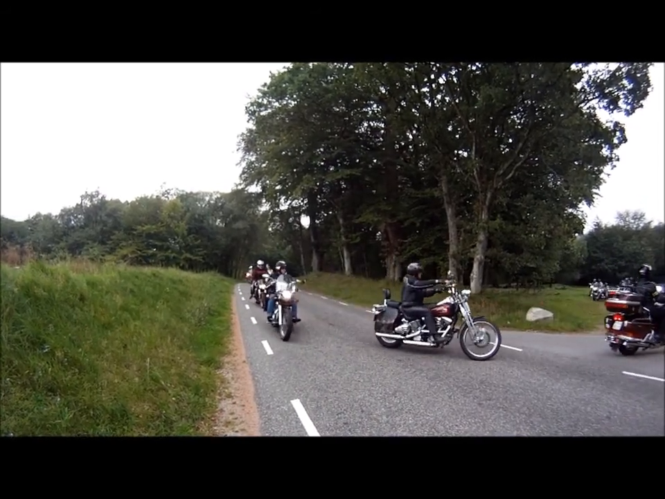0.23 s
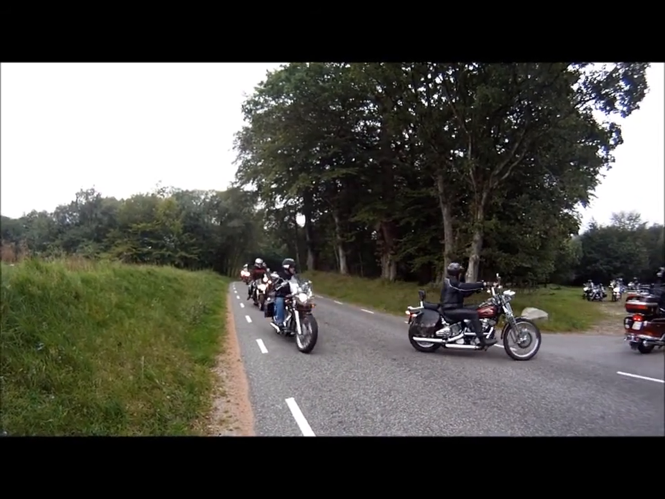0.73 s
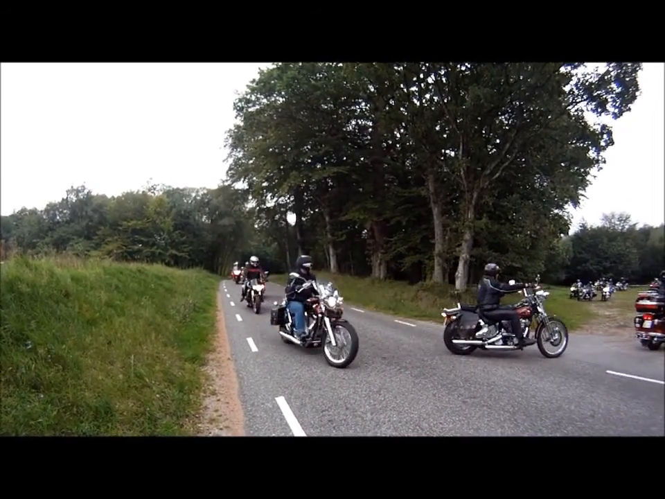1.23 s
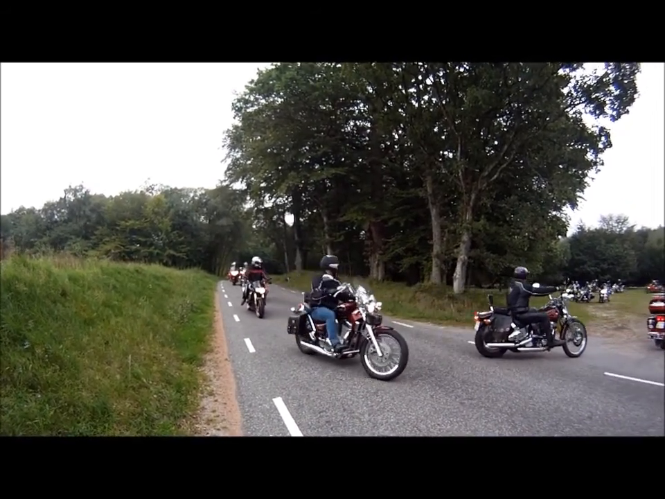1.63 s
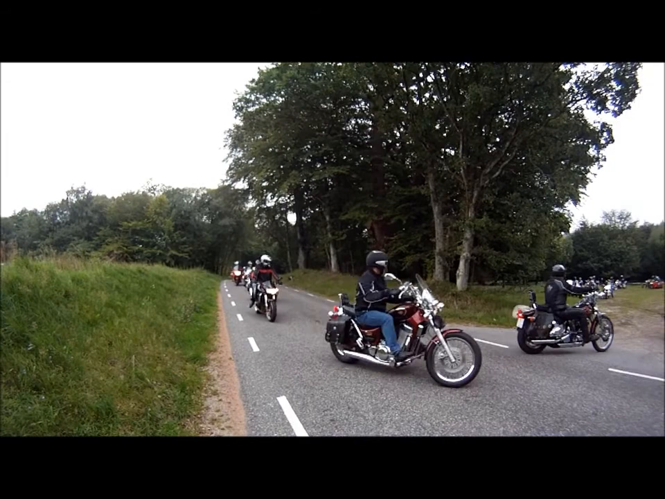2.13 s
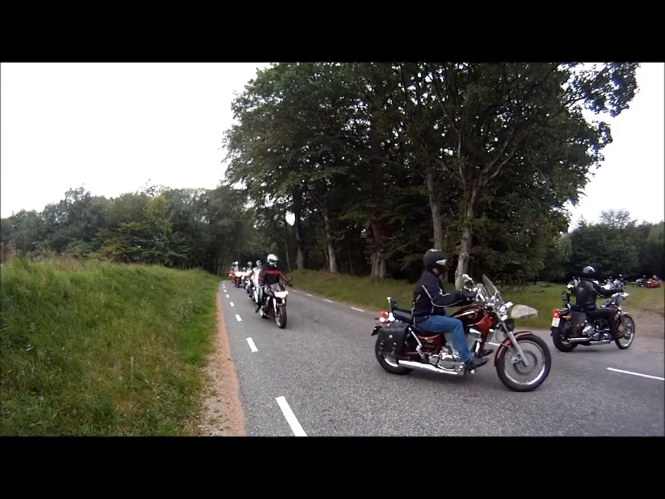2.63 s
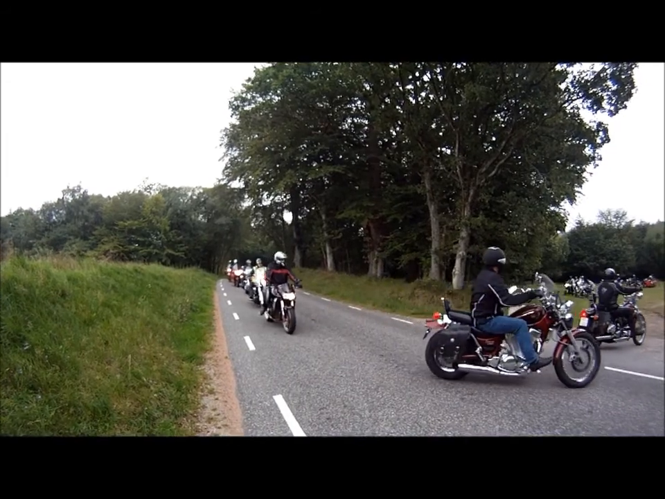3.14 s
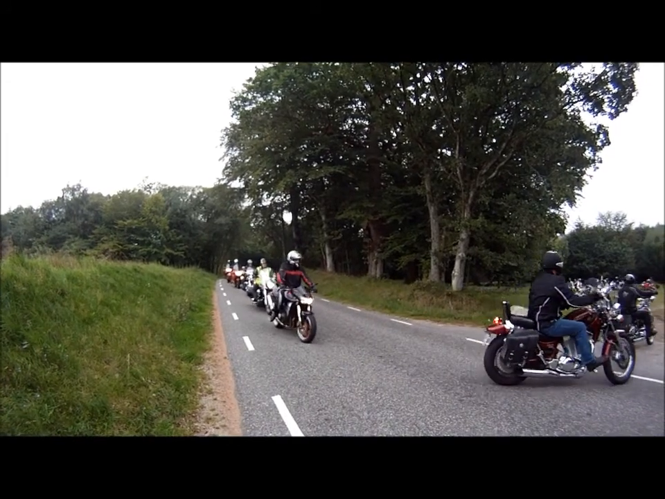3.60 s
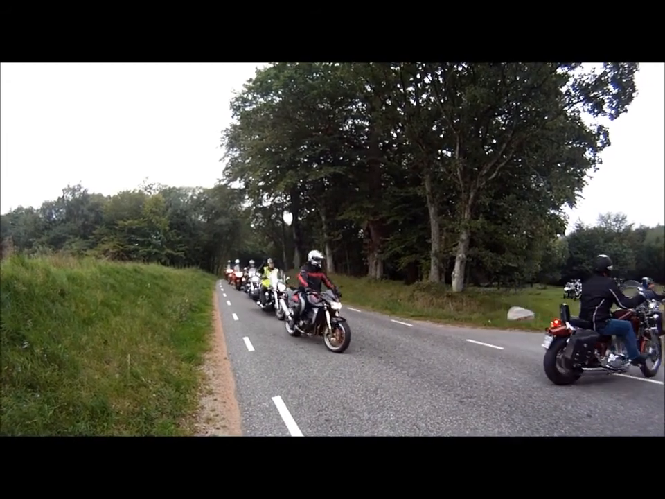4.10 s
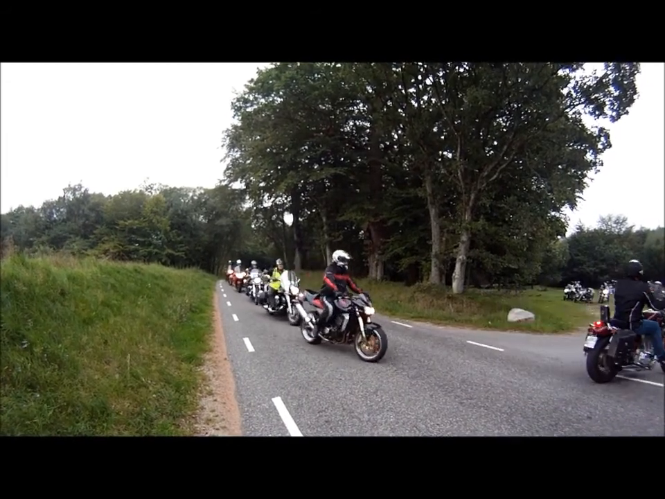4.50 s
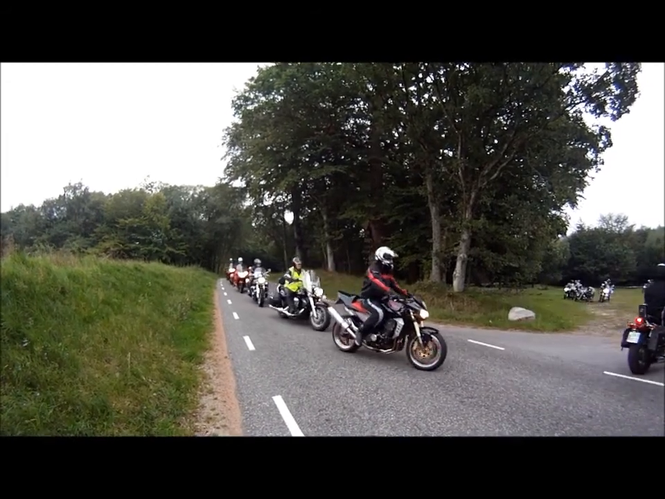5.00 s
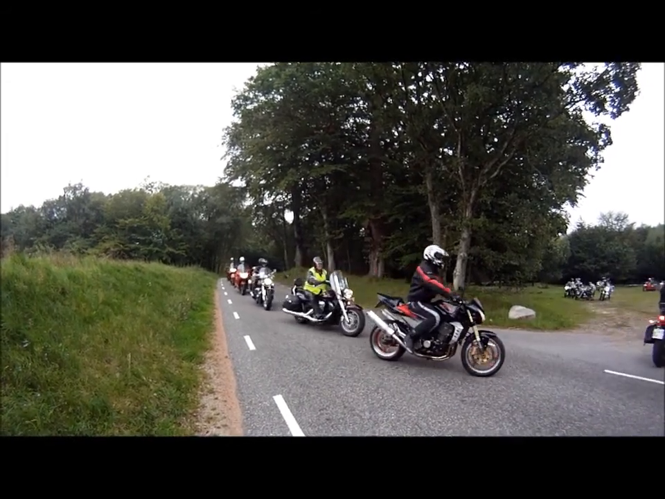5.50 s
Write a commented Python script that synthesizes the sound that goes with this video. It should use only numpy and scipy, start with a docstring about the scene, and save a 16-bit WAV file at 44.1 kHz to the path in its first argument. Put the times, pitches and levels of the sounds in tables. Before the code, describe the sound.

Motorcycles roll slowly past a small camera: thumping V-twin exhaust, low engine rumble, humming four-cylinder, clattering valves and faint brake squeaks.

```python
"""Uneven barks of a near V-twin over a rumbling column of motorcycles, slowly passing a small camera.
A four-cylinder bike hums, a leading bike burbles away, valve gear clatters, brakes squeak over low noise.
Exhausts are trains of firings that ring pipes and shape noise; the hum and squeaks are unsteady sines.
The camera ducks under loud peaks, and its coarse sampling mirrors everything into a gritty treble."""
import sys
import numpy as np
from scipy import signal
from scipy.fft import rfft, irfft, next_fast_len
from scipy.io import wavfile
from scipy.ndimage import uniform_filter1d, map_coordinates

SR = 44100
rng = np.random.default_rng(int(sys.argv[2]) if len(sys.argv) > 2 else 0)


def inscribe(sig):
    """Save sig as 16-bit PCM at rate SR to the path in sys.argv[1].

    A 1-D sig is mono; a 2-D sig holds one channel per row.
    Samples are clipped to [-1, 1] before scaling.
    """
    pcm = np.round(np.clip(np.atleast_2d(sig).T, -1, 1) * 32767)
    wavfile.write(sys.argv[1], SR, pcm.astype(np.int16))


N = 253575
T = np.arange(N) / SR  # seconds

# Levels in the tables are relative: each layer adds its own trims and scatter.
# Noise colours. Each row: frequency in Hz, relative level in dB.
LOW_NOISE_COLOUR = [(12, -24), (20, 9), (124, 1), (385, -14), (3010, -40.5), (5000, -51), (6500, -71),
                    (11000, -120)]
BURBLE_COLOUR = [(200, -12), (330, -0.5), (400, 0.5), (480, -6), (590, 4.5), (720, -6.5), (950, -28),
                 (1200, -9.5), (1500, -22), (3000, -40)]
MUFFLER_RESPONSE = [(20, -34), (30, -39), (40, 1), (55, -6.5), (70, -2), (120, -6), (200, -5.5),
                    (300, -10.5), (450, -19.5), (900, -31), (2000, -80)]  # a filter on the rumble rather than a noise
RASP_COLOUR = [(100, -43), (250, 8), (350, -1), (470, -9), (650, -4.5), (800, -9.5), (1100, -20),
               (2500, -37)]
CLATTER_COLOUR = [(500, -2.5), (1000, -4.5), (1500, 0), (2200, 3), (2480, -1), (2850, 4.5), (3300, -4),
                  (3900, -1.5), (4600, -8), (5800, -9)]
CHAIN_COLOUR = [(1000, -18), (3000, -12), (4300, -2), (5800, -10.5)]
GROWL_COLOUR = [(150, -29), (240, 9), (300, -3.5), (390, -2.5), (480, -12.5), (600, -21), (1150, -25),
                (2500, -36)]
BARK_COLOUR = [(100, -24), (280, 4), (450, -3), (640, -3), (800, -1), (1100, -20.5), (1600, -14.5),
               (3000, -27)]
SPIT_COLOUR = [(700, -29), (1300, -1.5), (1800, -9.5), (2300, 7.5), (2550, -9.5), (2900, 5), (3400, -0.5),
               (4100, -1), (5800, -13.5)]
# The column as a whole. Each row: time in seconds, rumble, exhaust rasp and clatter levels in dB.
COLUMN_LEVELS = [(0.05, -19, -37.5, -44.5), (0.67, -18, -36.5, -43), (1.44, -23, -40.5, -48),
                 (1.77, -17.5, -34.5, -42.5), (1.92, -22.5, -37, -46.5), (2.53, -19.5, -38, -45.5),
                 (3.5, -19.5, -38.5, -46), (3.89, -20.5, -34, -42), (4.36, -21.5, -39.5, -47),
                 (4.73, -19, -36.5, -42.5), (5.4, -20, -35.5, -41.5), (5.65, -20, -43.5, -44)]
# V-twins along the column. Each row: engine cycles a second at the start, at the end, pipe in Hz, level in dB.
FAR_TWINS = [(13.2, 14.5, 86.3, -3), (16.9, 15.6, 100.8, -1), (11.3, 12.2, 60, -5.5),
             (19.5, 21.4, 150.4, -8), (15.1, 17.7, 190, -7)]
# Clicks of chain and gearbox. Each row: time in seconds, level in dB.
CHAIN_CLICKS = [(0.5896, -35), (0.6078, -28.5), (3.6494, -25), (3.7025, -31), (3.7378, -21),
                (3.8162, -25.5), (3.892, -26), (3.9665, -32), (4.481, -27), (4.583, -27.5), (4.6824, -31),
                (4.8776, -30)]
# Squeaks of a dragging brake. Each row: middle in seconds, length in seconds, start Hz, end Hz, level in dB.
BRAKE_SQUEAKS = [(.92, .2, 3755, 3750, -54), (1.11, .17, 3750, 3745, -49), (2.14, .08, 3760, 3740, -49),
                 (2.36, .26, 3740, 3755, -53), (4.08, .1, 3780, 3725, -41), (4.245, .04, 3520, 3540, -44),
                 (5.2, .45, 3760, 3780, -50), (5.6, .3, 3820, 3870, -55)]
# Rough engine whines. Each row: middle in seconds, length in seconds, start Hz, end Hz, level in dB.
ENGINE_WHINES = [(0.3, 0.73, 1170, 1174, -57), (3.75, 0.794, 730, 765, -43.5),
                 (4.15, 0.2504, 590, 700, -44.5), (3.824, 0.4, 260, 256, -34)]
# The four-cylinder engine. Each row: time in seconds, pitch of its third order in Hz, level in dB.
FOUR_COURSE = [(0, 117, -18.5), (.6, 118.4, -23.5), (2.1, 116, -21.5), (2.7, 115.3, -22.5),
               (3.6, 116.5, -20), (3.95, 117.1, -15), (4.3, 114.5, -18.5), (4.9, 115.7, -17.5),
               (5.45, 116.1, -15.5), (5.75, 117.2, -16.5)]
# Its harmonics. Each row: multiple of the engine cycle, level in dB.
FOUR_ORDERS = [(1, -17), (2, -10), (3, -1.5), (4, -12), (5, -19.5), (6, -15), (7, -21)]
# The near V-twin's crank. Each row: time in seconds, engine cycles turned.
CRANK_TURNS = [(-.19, 0), (.103, 2), (.254, 3), (.395, 4), (.672, 6), (1.49, 12), (2.157, 17), (2.421, 19),
               (2.56, 20), (2.951, 23), (5.75, 44)]
# Its lope, three beats in two cycles. Each row: place in cycles, bark, thump and spit levels in dB.
LOPE_BEATS = [(0, -29, -9, -37), (.435, -22.5, -11.5, -31), (1, -21, -11, -30)]
# Its passing and riding off, for the loping beats. Each row: time in seconds, level in dB.
PASS_LEVELS = [(0, -2), (1.6, 1.5), (2.8, -2.5), (3.4, -9), (5.75, -16.5)]
# Single hard firings. Each row: time in seconds, bark, thump and spit levels in dB.
HARD_FIRINGS = [(.103, -22, -17, -33.5), (.17, -17.5, -1.5, -26), (.254, -16.5, -17, -30),
                (.456, -12, -4, -37), (.672, -15.5, -6.5, -26), (1.219, -23, -4.5, -34.5),
                (1.352, -18.5, -5.5, -25), (1.817, -15.5, -23, -26), (1.89, -11, -3.5, -18.5),
                (2.082, -17.5, -5, -21.5), (2.56, -17.5, -12.5, -27.5), (2.824, -16.5, -10, -27.5),
                (3.087, -19.5, -11, -36), (3.352, -21.5, -18, -37), (4.244, -33, -4, -38),
                (4.822, -20, -12.5, -37), (5.088, -15, -4, -28)]

HUM_ORDER = 3  # the order whose pitch FOUR_COURSE gives
GROWL_DB_PER_S = 0.83  # the growl gains on the hum as the bike nears
HOLD_HZ = 12000  # the camera's coarse sampling rate
TOP_HZ = 15500  # nothing passes above this


def amp(db):
    """Decibels to gain."""
    return 10 ** (np.asarray(db) / 20)


def unit(x):
    """Scale to rms 1."""
    return x / np.sqrt(np.mean(x ** 2) + 1e-20)


def along(points, hz):
    """Read a (Hz, value) table on a logarithmic frequency axis."""
    point_hz, values = np.transpose(points)
    return np.interp(np.log(hz + 1), np.log(point_hz + 1), values)


def curves(rows):
    """Draw a sample-by-sample curve through each column after the time."""
    seconds, *columns = np.transpose(rows)
    return [np.interp(T, seconds, column) for column in columns]


def wobble(rate):
    """A smooth random curve with rate knots a second."""
    knots = rng.standard_normal(int(N * rate / SR) + 4)
    return map_coordinates(knots, [T * rate])


def filtered(x, response):
    """Shape the spectrum of x by a function of frequency."""
    size = next_fast_len(N + SR // 2)
    spectrum = rfft(x, size) * response(np.fft.rfftfreq(size, 1 / SR))
    return irfft(spectrum, size)[..., :N]


def hiss(colour):
    """Coloured noise of rms 1."""
    return unit(filtered(rng.standard_normal(N), lambda hz: amp(along(colour, hz))))


def strikes(times, levels_db):
    """One impulse at each time."""
    places = np.clip(np.round(times * SR).astype(int), 0, N - 1)
    return np.bincount(places, amp(levels_db), N)


def bursts(times, levels_db, rise, life):
    """An envelope that swells over rise and dies over life, in seconds, at each time."""
    t = np.arange(SR // 10) / SR
    shape = (1 - np.exp(-(t / rise) ** 2)) * np.exp(-t / life)
    return signal.fftconvolve(strikes(times, levels_db), shape / shape.max())[:N]


def rings(times, hz, levels_db, rise, life):
    """A short ring that starts afresh, at its own pitch, at each time."""
    latest = np.maximum(np.searchsorted(times, T) - 1, 0)
    wave = np.sin(2 * np.pi * hz[latest] * (T - times[latest]))
    return -bursts(times, levels_db, rise, life) * wave


def crossings(cycles):
    """The moments at which a cycle count passes whole numbers."""
    return T[1:][np.diff(np.floor(cycles)) > 0]


def tone(middle, length, start_hz, end_hz, db, waver, flutter_db):
    """A gliding, unsteady sine that swells and fades."""
    place = np.clip((T - middle) / length, -0.5, 0.5)
    glide_hz = start_hz + (end_hz - start_hz) * (place + 0.5)
    phase = 2 * np.pi * np.cumsum(glide_hz * (1 + waver * wobble(220))) / SR
    level = amp(db + flutter_db * wobble(35)) * np.cos(np.pi * place)
    return level * np.sqrt(2) * np.sin(phase)


def low_noise(db=-38, swell_db=2, fade_db_per_s=1):
    """Faint low noise, separate in each channel, slowly fading."""
    channels = [amp(db - fade_db_per_s * T + swell_db * wobble(20)) * hiss(LOW_NOISE_COLOUR) for side in "LR"]
    return np.array(channels)


def leaving_bike(puffs_per_s=27, db=-33, fade_db_per_s=11, scatter_db=2):
    """The leading bike puffs out burbling gas at an unsteady rate and fades round the bend."""
    times = crossings(np.cumsum(puffs_per_s * (1 + 0.162 * wobble(18))) / SR)
    sizes_db = scatter_db * rng.standard_normal(len(times))
    puffs = bursts(times, sizes_db, rise=0.005, life=0.014)
    return amp(db - fade_db_per_s * T) * unit(puffs) * hiss(BURBLE_COLOUR)


def pipe_resonance(hz, pipe_hz, sharpness):
    """A pipe rings around its own pitch; sharpness is its Q."""
    damping = 1j * hz * pipe_hz / sharpness
    return damping / (pipe_hz ** 2 - hz ** 2 + damping)


def far_twins(bank=0.43, sharpness=2.03, scatter_db=1.33, rumble_db=1, rasp_db=2, steady=0.19):
    """Two firings a cycle, bank of a cycle apart, ring each bike's pipe and puff out rasping gas."""
    rumble_level, rasp_level, _ = curves(COLUMN_LEVELS)
    rumble, puffs = np.zeros(N), np.zeros(N)
    for start, end, pipe_hz, db in FAR_TWINS:
        speed = np.linspace(start, end, N) * (1 + 0.03 * wobble(3))
        cycles = rng.random() + np.cumsum(speed) / SR
        times = np.concatenate([crossings(cycles), crossings(cycles + bank)])
        sizes_db = db + scatter_db * rng.standard_normal(len(times))
        firings = bursts(times, sizes_db, rise=0.00037, life=0.00093)
        rumble += filtered(firings, lambda hz: pipe_resonance(hz, pipe_hz, sharpness))
        puffs += bursts(times, sizes_db, rise=0.0015, life=0.0067)
    rumble = unit(filtered(rumble, lambda hz: amp(along(MUFFLER_RESPONSE, hz))))
    rasp = unit(steady + unit(puffs)) * hiss(RASP_COLOUR)
    return amp(rumble_level + rumble_db) * rumble + amp(rasp_level + rasp_db) * rasp


def clatter(clatter_db=3.5, steady=1.88, scatter_db=4, click_db=-1):
    """Dense taps of many valves over steady tyre hiss, with single clicks of chain and gearbox."""
    level = curves(COLUMN_LEVELS)[2]
    tap_times = rng.uniform(0, N / SR, size=700)
    taps = bursts(tap_times, scatter_db * rng.standard_normal(size=700), rise=0.00016, life=0.0061)
    valves = amp(level + clatter_db) * unit(steady + unit(taps)) * hiss(CLATTER_COLOUR)
    click_times, click_levels = np.transpose(CHAIN_CLICKS)
    clicks = bursts(click_times, click_levels + click_db, rise=0.001, life=0.0051)
    return valves + clicks * hiss(CHAIN_COLOUR)


def brake_squeaks():
    """A dragging brake disc sings in nearly steady tones."""
    return sum(tone(*row, waver=0.00593, flutter_db=2.5) for row in BRAKE_SQUEAKS)


def engine_whines():
    """Passing engines whine, roughened by a quick waver of pitch and level."""
    return sum(tone(*row, waver=0.0351, flutter_db=4.0) for row in ENGINE_WHINES)


def four_cylinder(hum_db=-2, shake=0.097, chop=0.98, growl_db=-16.5, hunt=0.00818):
    """Wavering orders of the engine cycle make the hum; gas growls in a swell once a cycle."""
    hum_hz, level = curves(FOUR_COURSE)
    cycle_hz = hum_hz * (1 + hunt * wobble(6)) / HUM_ORDER
    phase = 2 * np.pi * np.cumsum(cycle_hz) / SR
    hum = np.zeros(N)
    for order, db in FOUR_ORDERS:
        shaken = round(order) * (phase + shake * wobble(12)) + 2 * np.pi * rng.random()
        hum += amp(db + 1.6 * wobble(7.6)) * np.sin(shaken)
    growl_level = amp(growl_db + GROWL_DB_PER_S * (T - T.mean()))
    growl = growl_level * unit(1 + chop * np.cos(phase)) * hiss(GROWL_COLOUR)
    return amp(level) * (amp(hum_db) * np.sqrt(2) * hum + growl)


def twin_beats(scatter_db=2.5, thump_scatter_db=2.0):
    """The lope repeats every two crank cycles; a hard firing replaces any beat it falls on."""
    clock, turned = np.transpose(CRANK_TURNS)
    place, bark, thump, spit = np.tile(LOPE_BEATS, (int(turned[-1]) // 2, 1)).T
    cycles = place + 2 * (np.arange(len(place)) // len(LOPE_BEATS))
    times = np.interp(cycles, turned, clock)
    level = np.interp(times, *np.transpose(PASS_LEVELS))
    force = level + scatter_db * rng.standard_normal(len(times))
    thump_force = level + thump_scatter_db * rng.standard_normal(len(times))
    beats = np.column_stack([times, bark + force, thump + thump_force, spit + force])
    gaps = np.abs(times[:, None] - np.array(HARD_FIRINGS)[:, 0]).min(axis=1)
    free = (times > 0) & (gaps > 0.02)
    beats = np.vstack([beats[free], HARD_FIRINGS])
    return beats[np.argsort(beats[:, 0])]


def near_twin():
    """Each beat is a heavy swing of pressure; gas barks and spits around it, and the pipe knocks and pings."""
    times, bark, thump, spit = twin_beats().T
    t = np.arange(-SR // 40, SR // 40) / SR
    swing = np.cos(2 * np.pi * 118 * t) * np.exp(-np.abs(t / 0.0035) ** 2 / 2)
    # the swing crests 4.52 ms after the firing
    body = signal.fftconvolve(strikes(times + 0.00452, thump + 4), swing, "same")
    knock_hz = 630 * (1 + 0.06 * rng.standard_normal(len(times)))
    knocks = rings(times, knock_hz, bark - 3, rise=0.0029, life=0.0032)
    barks = bursts(times, bark - 5, rise=0.002, life=0.0053) * hiss(BARK_COLOUR)
    spits = bursts(times + 0.0042, spit - 1, rise=0.003, life=0.0024) * hiss(SPIT_COLOUR)
    ping_hz = 2850 * (1 + 0.0457 * rng.standard_normal(len(times)))
    pings = rings(times + 0.001975, ping_hz, spit - 4, rise=0.0058, life=0.0033)
    return body + knocks + barks + spits + pings


def scene():
    """All the bikes in mono, with separate low noise in each channel."""
    background = low_noise() + leaving_bike() + far_twins()
    details = clatter() + brake_squeaks() + engine_whines()
    return background + details + four_cylinder() + near_twin()


def gain_control(x, ceiling_db=-5, recovery_db_per_s=65, roughness_db=-21, roughness_hz=1200):
    """Peaks over the ceiling pull the gain down at once; it recovers at a steady rate in dB."""
    peak_db = 20 * np.log10(np.abs(x).max(0) + 1e-9)
    excess = np.maximum(peak_db - ceiling_db, 0)
    recovery = recovery_db_per_s * T
    cut = np.maximum.accumulate(excess + recovery) - recovery
    # a little random roughness in level, separate in each channel, while the gain falls
    is_falling = (np.diff(cut, prepend=0) > 1e-6) * 1.0
    falling = np.abs(uniform_filter1d(is_falling, size=128))  # abs clears rounding below zero
    jitter = unit(filtered(rng.standard_normal(x.shape), lambda hz: 1 / (1 + 1j * hz / roughness_hz)))
    roughness = 1 + amp(roughness_db) * np.sqrt(falling) * jitter
    return x * amp(-uniform_filter1d(cut, size=64)) * roughness


def band_limit(hz, band_hz=5300):
    """A steep roll-off, cut dead at half the coarse sampling rate."""
    return (hz < HOLD_HZ / 2) / np.sqrt(1 + (hz / band_hz) ** 20)


def hold_droop(hz):
    """Holding each coarse sample for four finer steps dulls the treble, up to a hard top."""
    return np.sinc(hz / HOLD_HZ) / np.sinc(hz / (4 * HOLD_HZ)) * (hz < TOP_HZ)


def record(dry):
    """The camera rides its gain, then holds coarse samples, mirroring the sound about their rate."""
    limited = filtered(gain_control(dry), band_limit)
    mirrored = limited * (1 + 2 * np.cos(2 * np.pi * HOLD_HZ * T))
    return filtered(mirrored, hold_droop)


dry = scene()
out = record(dry)
inscribe(out)
```